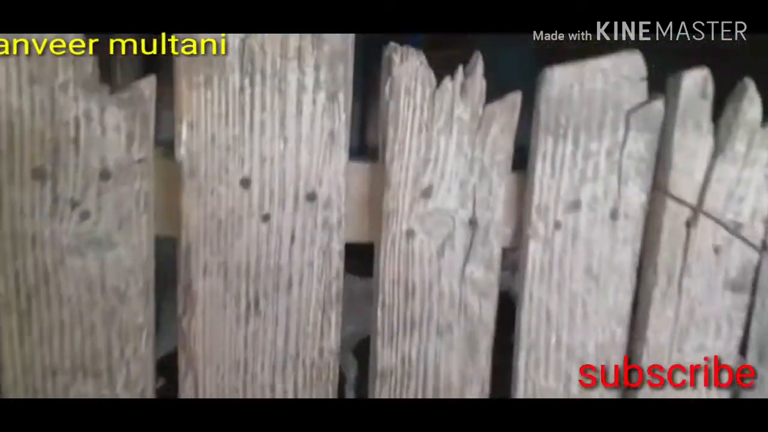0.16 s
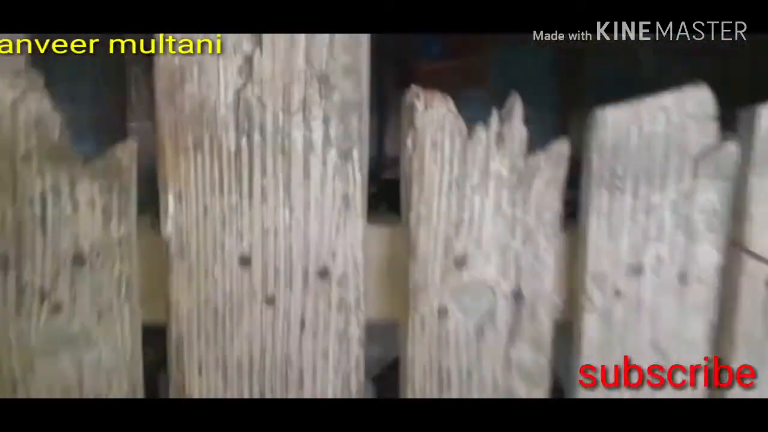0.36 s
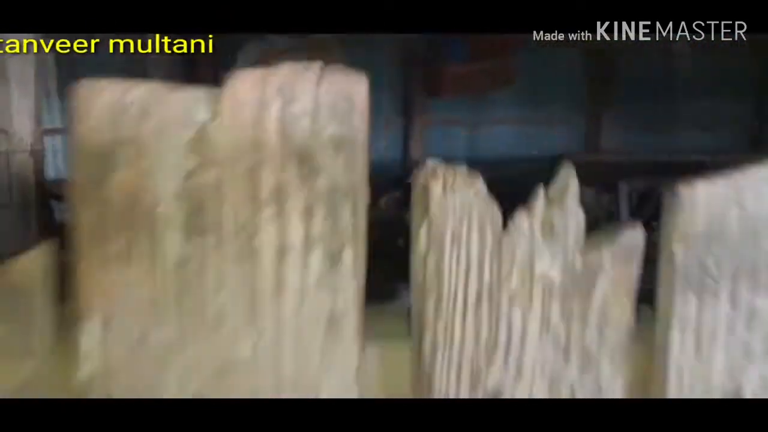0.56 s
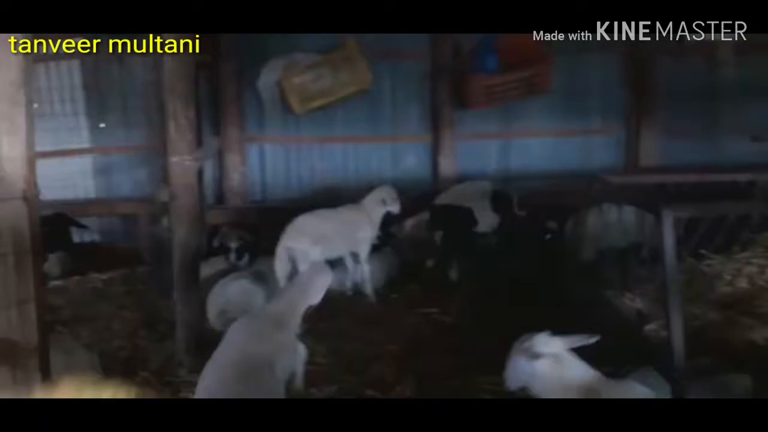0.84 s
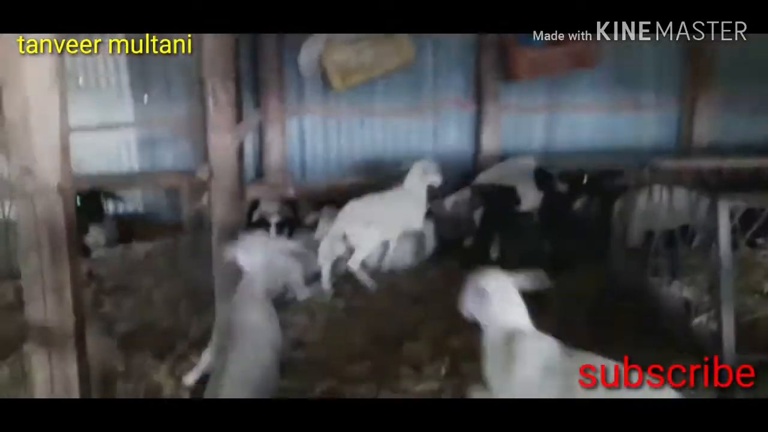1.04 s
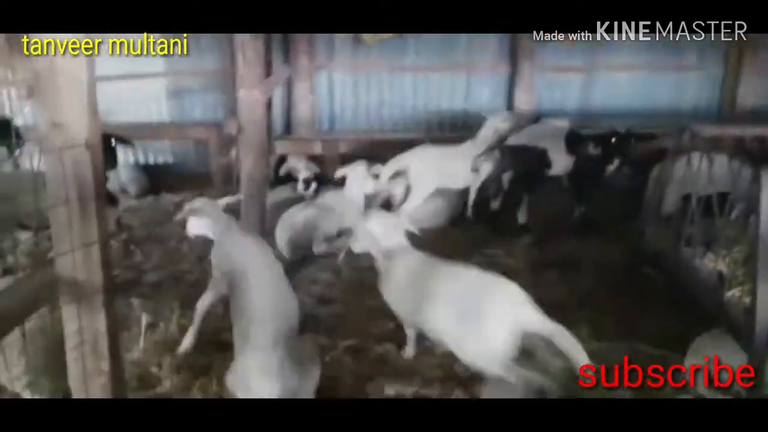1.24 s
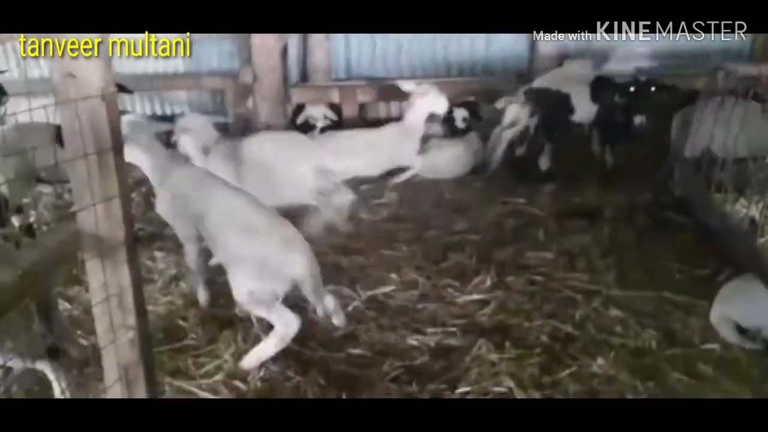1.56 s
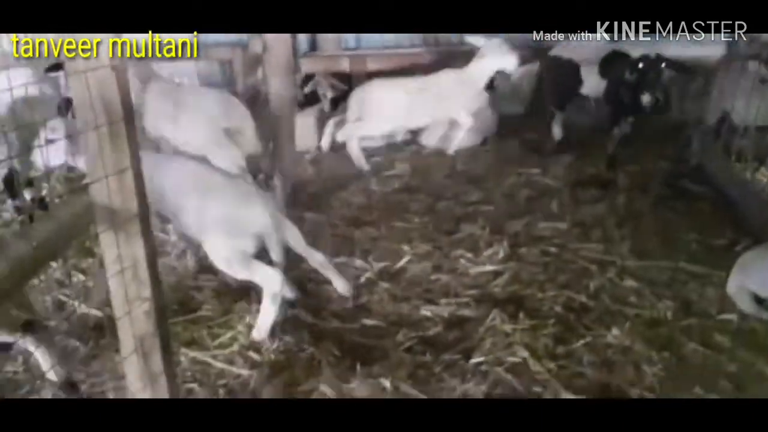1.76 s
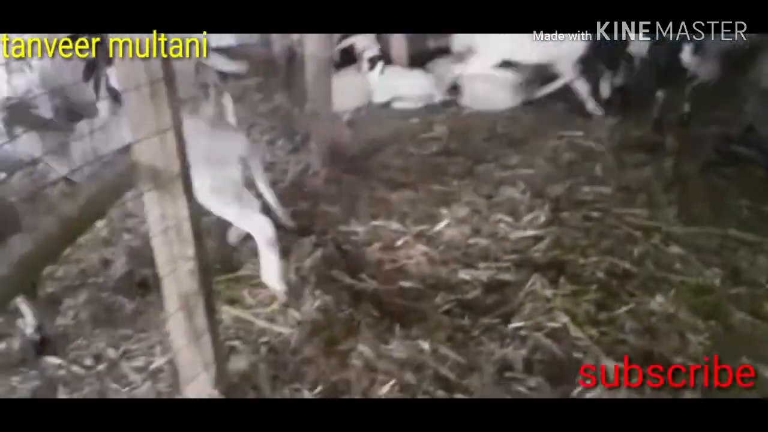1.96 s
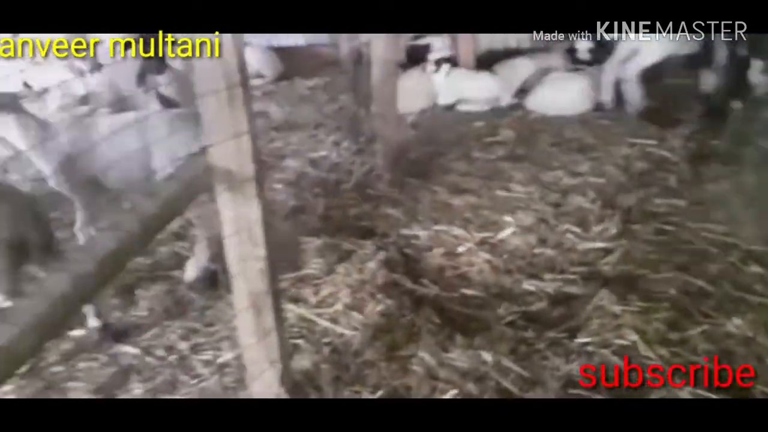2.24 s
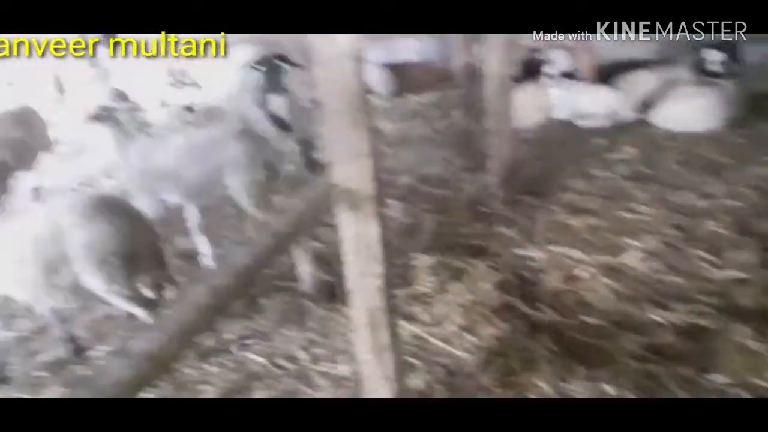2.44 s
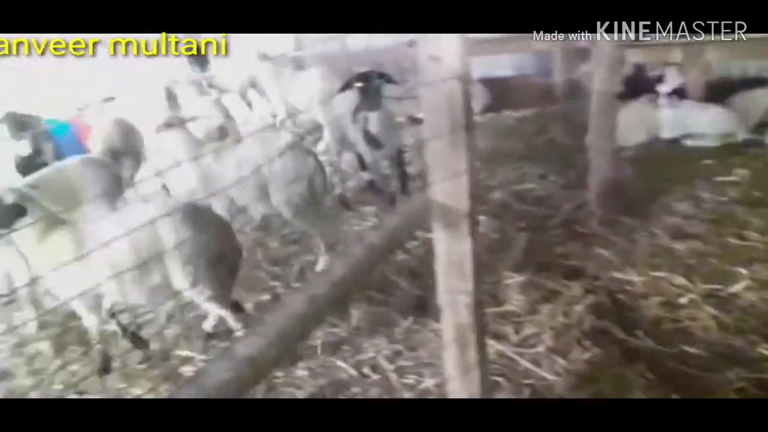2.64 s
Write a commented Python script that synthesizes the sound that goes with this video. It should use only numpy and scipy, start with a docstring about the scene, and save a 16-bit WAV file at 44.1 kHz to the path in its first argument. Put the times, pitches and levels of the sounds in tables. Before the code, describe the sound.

Galloping hooves of bolting sheep, low thuds and hollow knocks over crackling straw in a barn

```python
"""Sheep bolt across the straw-bedded floor of a shed, a few metres from the microphone.
From the start straw hisses and crackles under their legs and the rest of the flock tramples softly behind.
A few hooves skid in short rough scrapes, most of them early on, as filtered noise and wavering tones.
Then hooves fall all through: damped sines and noise give each a low thump and a hollow knock, and those
that meet hard spots add a gritty, ringing clack. The shed returns a short diffuse echo of the near hooves."""
import sys
import numpy as np
from scipy import signal
from scipy.fft import rfft, irfft
from scipy.io import wavfile

SR = 44100
rng = np.random.default_rng(int(sys.argv[2]) if len(sys.argv) > 2 else 0)


def bounce(signal):
    """Save signal as a 16-bit WAV file at the path given by the first command-line argument."""
    frames = np.transpose(np.atleast_2d(signal))
    limited = np.clip(frames, -1, 1)
    pcm = np.round(limited * 32767).astype(np.int16)
    wavfile.write(sys.argv[1], SR, pcm)


N = 123480
HOOF_S = 0.2   # length kept of every near blow

# spectrum of a hoof against a hard surface: f/Hz, relative level/dB per Hz
CLACK_SPECTRUM = [(250, -28), (480, 4.5), (750, 5), (1150, -0.5), (1500, -2.5), (2500, -12), (6000, -70)]


def from_db(db):
    """Decibels to gain."""
    return 10 ** (np.asarray(db) / 20)


def rms_one(x):
    """Scale to unit power."""
    return x / np.sqrt(np.mean(x ** 2) + 1e-20)


def in_time(rows):
    """Join the points of a curve by straight lines."""
    return np.interp(np.arange(N) / SR, *np.transpose(rows))


def at_bins(points, size):
    """Read a curve over log frequency at the bins of a transform."""
    hz, value = np.transpose(points)
    bin_hz = np.arange(size // 2 + 1) * SR / size
    return np.interp(np.log(bin_hz + 1), np.log(hz), value)


def dying(t, t60):
    """Exponential decay by 60 dB in t60 seconds."""
    return np.exp(-np.log(1000) * t / t60)


def linger(kicks, t60):
    """Let every kick die away exponentially, adding to those before it."""
    return signal.lfilter([1], [1, -dying(1 / SR, t60)], kicks)


def colour(pair, spectrum):
    """Two unrelated signals become a stereo sound with this spectrum, alike in the bass; rms 1."""
    # how alike the two sides are: f/Hz, left-right correlation [-1 to 1]
    likeness = [(100, 0.97), (350, 0.88), (700, 0.36), (1400, -0.24), (2800, -0.038), (6000, -0.062),
                (14000, 0.026)]
    size = pair.shape[1]
    mid, side = rfft(pair) * from_db(at_bins(spectrum, size))
    alike = np.clip(at_bins(likeness, size), -.99, .99)
    mid = mid * np.sqrt(1 + alike)
    side = side * np.sqrt(1 - alike)
    return rms_one(irfft(np.array([mid + side, mid - side]), size))


def add(out, s, sound):
    """Mix a sound in at a time, trimmed to the scene."""
    start = int(s * SR)
    first, last = max(start, 0), min(start + sound.shape[-1], N)
    out[:, first:last] += sound[..., first - start:last - start]


def ring(t, modes, pitch, hold_s=0):
    """Damped sines of a struck body, held at full strength for a moment before they decay."""
    decay_t = np.maximum(t - hold_s, 0)
    return sum(from_db(db) * dying(decay_t, t60) * np.sin(2 * np.pi * hz * pitch * t)
               for hz, db, t60 in modes)


def wavering(t, hz, waver, count=90):
    """A tone of height 1 whose pitch wanders by a share, slightly out of step on the two sides."""
    knots = t[::count]
    pitch = hz * (1 + waver * np.interp(t, knots, rng.standard_normal(len(knots))))
    return np.sin(2 * np.pi * np.cumsum(pitch) / SR + rng.uniform(-1.28, 1, (2, 1)))


def flock():
    """Animals farther off trample in dull random thuds: noise swelled by kicks that die away over a bed."""
    # spectrum of the far trampling: f/Hz, relative level/dB per Hz
    trample_spectrum = [(25, -16), (40, -8), (55, -1.5), (90, -3), (120, 0.5), (165, -6), (240, 0),
                        (345, 2.5), (430, -10.5), (600, -18.5), (1100, -25.5), (2200, -25.5), (6000, -32)]
    # the far trampling comes and goes: t/s, level/dB
    trample_level = [(0, -30), (.45, -37.5), (.7, -29.5), (.85, -37), (1.07, -32.5), (1.3, -34.5),
                     (1.94, -34.5), (2.15, -27.5), (2.58, -37.5), (2.8, -36.5)]
    steps_per_s, step_t60_s, bed = 27, 0.16, .45
    steps = (rng.random(N) < steps_per_s / SR) * rng.uniform(0.53, 1, N)
    thuds = bed + linger(steps, step_t60_s)
    trampling = colour(thuds * rng.standard_normal((2, N)), trample_spectrum)
    return from_db(in_time(trample_level)) * trampling


def straw():
    """Stalks rub in a soft hiss and snap in dense tiny clicks, bunched into short crunches."""
    # spectrum of hiss and clicks: f/Hz, relative level/dB per Hz
    straw_spectrum = [(500, 4.5), (1200, 2.5), (2200, -1.5), (4200, 0.5), (5400, -1.5), (7300, -2),
                      (9100, 2), (10500, -3), (12500, 1.5), (15500, -7.5)]
    # stirring of the straw: t/s, relative level/dB
    straw_level = [(0.0, -57), (0.02, -50.5), (0.12, -54.5), (0.14, -44.5), (0.21, -52), (0.22, -44.5),
                   (0.33, -42.5), (0.44, -47.5), (0.49, -41.5), (0.55, -48.5), (0.65, -43), (0.69, -52.5),
                   (0.79, -41), (0.81, -47.5), (0.88, -51), (0.9, -43.5), (0.95, -45.5), (0.985, -36),
                   (1.09, -49.5), (1.19, -43.5), (1.32, -51), (1.35, -46.5), (1.57, -43.5), (1.64, -50.5),
                   (1.65, -41.5), (1.67, -37.5), (1.7, -46.5), (1.81, -47.5), (1.86, -43.5), (1.9, -48),
                   (1.96, -45), (2.12, -43.5), (2.21, -47.5), (2.46, -48), (2.49, -44), (2.53, -49.5),
                   (2.8, -45.5)]
    # lean across the stereo picture: f/Hz, left minus right/dB
    straw_balance = [(1000, -1), (3000, 0), (5000, -2.5), (8000, -5), (10500, 5), (13000, 5.5), (16000, 9)]
    hiss_db, crackle_db, snap_spread_db = 1.5, 1, 2
    snaps_per_s = 3000   # average on each side, denser as the straw stirs more
    crunches_per_s, crunch_size, crunch_t60_s = 42, 0.54, 0.048

    stir = from_db(in_time(straw_level))
    born = rng.random((2, N)) < snaps_per_s * stir / stir.mean() / SR
    heights = from_db(snap_spread_db * np.minimum(rng.exponential(1, (2, N)), 4))
    snaps = born * heights * rng.choice([-1, 1], (2, N))
    hiss = from_db(hiss_db) * colour(rng.standard_normal((2, N)), straw_spectrum)
    crackle = from_db(crackle_db) * colour(snaps, straw_spectrum)
    # bundles of stalks give way at once
    breaks = (rng.random(N) < crunches_per_s / SR) * rng.uniform(0.78, 0.85, N)
    crunch = rms_one(1 + crunch_size * linger(breaks, crunch_t60_s))
    # half the difference goes to each side
    lean = from_db(at_bins(straw_balance, N) * np.array([[.5], [-.5]]))
    return stir * crunch * irfft(rfft(hiss + crackle) * lean, N)


def shed(x):
    """A short diffuse echo from the walls and roof: x convolved with noise that swells in and decays."""
    # colour of the echo: f/Hz, relative level/dB
    echo_spectrum = [(100, -7), (350, -3), (700, -1), (8000, -8)]
    swell_s, echo_t60_s = .012, 0.15
    t = np.arange(SR // 2) / SR
    tail = colour(rng.standard_normal((2, len(t))), echo_spectrum)
    tail = tail * dying(t, echo_t60_s) * np.minimum(t / swell_s, 1) ** 2
    return signal.fftconvolve(x, rms_one(tail) / np.sqrt(len(t)), axes=1)[:, :N]


def skids(rise_s=0.00075, count=130):
    """A sliding hoof sticks and slips in a short, rough, rising scrape, with rubbing noise around it."""
    # skids: t/s, length before the decay/s, relative level/dB, f/Hz midway
    skid_rows = [(-0.005, 0.012, -34.5, 890), (0.076, 0.013, -32.5, 919), (0.236, 0.018, -39, 1190),
                 (0.241, .024, -30.5, 645.4), (0.526, 0.013, -40.5, 868), (2.706, 0.01, -45, 1100)]
    waver, roughness = .06, .6      # shares of pitch and of strength
    pitch_rise_per_s = 2            # share of the pitch per second
    skid_t60_s, rub_db = .065, -4   # rub against the scraping tone
    out, t = np.zeros((2, N)), np.arange(int(HOOF_S * SR)) / SR
    knots = t[::count]
    for s, length, db, hz in skid_rows:
        rub = colour(rng.standard_normal((2, len(t))), CLACK_SPECTRUM)
        grip = np.abs(1 + roughness * np.interp(t, knots, rng.standard_normal(len(knots))))
        pitch = hz * (1 + pitch_rise_per_s * (np.minimum(t, length) - length / 2))
        scrape = rms_one(wavering(t, pitch, waver))
        slide = rms_one(grip * (scrape + from_db(rub_db) * rub))
        shape = np.minimum(t / rise_s, 1) * dying(np.maximum(t - length, 0), skid_t60_s)
        add(out, s, from_db(db) * slide * shape)
    return out


def grains(size, top_hz, count=30):
    """Gritty noise in tiny uneven clumps, dulled above its top by the bedding."""
    # spectrum of the grit: f/Hz, relative level/dB per Hz
    grit_spectrum = [(700, 5.5), (1300, 0.5), (1800, 0.5), (2400, -0.5), (3300, -1.5), (4400, 3),
                     (5600, -12), (14000, -31)]
    clump_db = 4 * rng.uniform(-1.8, 2.0, size // count + 1)
    clumps = np.repeat(from_db(clump_db), count)[:size]
    noise = colour(rng.standard_normal((2, size)) * clumps, grit_spectrum)
    return rms_one(signal.sosfilt(signal.butter(5, top_hz, fs=SR, output="sos"), noise))


def wood(t, side_phase=0.27):
    """One blow on the woody modes, each reaching the two sides slightly out of step."""
    # woody ring in a clack: f/Hz, relative level/dB, t60/s
    wood_modes = [(466, 0, 0.099), (747, 0.5, 0.075), (941, -2, 0.13), (1126, -9.5, 0.062),
                  (1503, -14, 0.12), (1765, -12.5, 0.099), (1940, -8.5, 0.11)]
    wood_db, spread_db = -10, 2   # every blow strikes these modes differently
    out = 0
    for hz, db, t60 in wood_modes:
        phase = rng.uniform(0, 2 * np.pi) + side_phase * rng.standard_normal((2, 1))
        gain = from_db(wood_db + db + spread_db * rng.standard_normal())
        out = out + gain * dying(t, t60) * np.sin(2 * np.pi * hz * t + phase)
    return out


def clatter(t):
    """The envelope of a blow's first snap, then smaller ones at random as the hoof settles."""
    rebounds_per_s, rebound_size = 130, .8
    snap_db, snap_t60_s = 3, .014
    born = rng.random(len(t)) < rebounds_per_s / SR
    jolts = born * rng.random(len(t)) * rebound_size * dying(t, HOOF_S)
    jolts[0] = 1
    return from_db(snap_db) * linger(jolts, snap_t60_s)


def clacks():
    """A hoof that meets something hard clatters, crushes grit and sets that spot ringing at its own pitch."""
    # hard blows: t/s, clack level/dB, grit level/dB, top of the grit f/Hz, ring level/dB, ring f/Hz
    # (levels relative, ring pitch wavers)
    hard_blows = [(0.395, -30.5, -31.5, 2400, -46, 610), (0.134, -41, -41, 1800, -24, 610),
                  (0.577, -25, -38, 1750, -23, 798), (0.651, -32, -42, 2400, -26, 660),
                  (0.745, -41, -39, 2440, -39, 714), (0.217, -39, -48, 1800, -37, 640),
                  (0.9985, -18.5, -25, 4900, -15, 1123), (1.009, -29, -36, 4700, -26, 1000),
                  (1.028, -35, -42, 4300, -39, 735), (1.120, -34, -38.5, 3930, -26, 643),
                  (1.181, -43, -49, 2200, -26.5, 510), (1.304, -37.5, -43, 1490, -42.5, 1105),
                  (1.356, -30, -51, 1700, -33, 1182), (1.449, -37.5, -49, 1700, -29, 816),
                  (1.470, -32.5, -39, 2200, -37, 933), (1.582, -29, -35, 2320, -16, 480),
                  (1.607, -41, -50, 1500, -27, 490), (1.676, -34, -30, 2300, -26, 1750),
                  (2.041, -34, -35, 2210, -22, 680), (2.072, -33, -34.5, 2880, -25.5, 610),
                  (2.175, -34, -54, 1500, -16.5, 745), (2.280, -43.5, -33.5, 1980, -32, 1014)]
    noise_db, noise_t60_s = .5, .1
    grit_gain_db, grit_t60_s = 7, .1
    tock_waver, tock_t60_s = .06, .045   # waver as a share of the pitch
    rise_s = .0004
    out, t = np.zeros((2, N)), np.arange(int(HOOF_S * SR)) / SR
    for s, clack_db, grit_db, top_hz, tock_db, tock_hz in hard_blows:
        snap = clatter(t)
        noise = from_db(noise_db) * colour(rng.standard_normal((2, len(t))), CLACK_SPECTRUM)
        clack = noise * (dying(t, noise_t60_s) + snap) / 2 + wood(t)
        grit = from_db(grit_gain_db) * grains(len(t), top_hz) * (dying(t, grit_t60_s) + snap) / 2
        tock = wavering(t, tock_hz, tock_waver) * dying(t, tock_t60_s)
        blow = from_db(clack_db) * clack + from_db(grit_db) * grit + from_db(tock_db) * tock
        add(out, s, blow * np.minimum(t / rise_s, 1))
    return out


def hooves():
    """Each hoof rings the floor in low damped sines and knocks on the packed bedding."""
    # hoof falls: t/s, thump level/dB, knock level/dB, knock pitch f/Hz (levels relative)
    hoof_falls = [(0.063, -48, -24, 334), (0.133, -29, -12, 322.5), (0.144, -40, -15, 317),
                  (0.216, -42, -22.5, 265), (0.245, -25, -26, 244), (0.322, -29, -30, 342),
                  (0.395, -33, -23.5, 280), (0.498, -26, -28, 335), (0.577, -14.5, -13.5, 321),
                  (0.622, -19, -25.5, 338), (0.65, -19, -21.5, 276), (0.69, -28.5, -33, 294),
                  (0.745, -27, -20.5, 302), (0.775, -24.5, -32, 269), (0.891, -26, -28, 299),
                  (0.91, -24, -29.5, 306), (0.998, -28, -11, 350), (1.009, -29, -14, 349.7),
                  (1.028, -22.5, -18.5, 358), (1.065, -24, -32, 300), (1.119, -31, -16, 321),
                  (1.181, -26.5, -25.5, 332), (1.245, -32, -33, 319), (1.302, -45, -35.5, 307),
                  (1.357, -49, -22.5, 283), (1.383, -24, -31.5, 271), (1.411, -26.5, -30, 269),
                  (1.448, -29, -30.5, 262), (1.471, -29, -27.5, 306), (1.560, -47, -23, 334),
                  (1.582, -15, -17.5, 332.5), (1.595, -38, -14.5, 334), (1.633, -39, -24.5, 329),
                  (1.676, -27.5, -32, 303), (1.685, -29, -14, 319.6), (1.728, -30, -26.5, 340),
                  (1.783, -29, -27.5, 346), (1.868, -24, -21.5, 262.6), (1.935, -34, -40, 310),
                  (2.042, -30, -16.5, 335), (2.067, -14.5, -17, 306), (2.092, -26, -19, 333),
                  (2.174, -20, -17.5, 343), (2.199, -30, -20.5, 298), (2.232, -21.5, -27.5, 277),
                  (2.286, -27, -27.5, 363), (2.313, -24.5, -20.5, 311), (2.363, -31, -27.5, 303),
                  (2.406, -43, -17, 344), (2.499, -34, -27, 361), (2.533, -32.5, -30, 299),
                  (2.641, -26, -28.5, 317), (2.716, -26, -35, 274)]
    # low ring of the floor: f/Hz before the 0.99 tuning below, relative level/dB, t60/s
    floor_modes = [(58.2, -1.5, 0.21), (93.5, 0.5, 0.12), (114.3, -1, 0.22), (159, -16, 0.049)]
    # hollow knock: multiple of the knock pitch, relative level/dB, t60/s
    knock_modes = [(0.681, -6, 0.097), (1.001, 5, 0.061), (1.219, -7.5, 0.051), (1.552, -16.5, 0.068)]
    # spectrum of the noise in a knock: f/Hz, relative level/dB per Hz
    body_spectrum = [(100, 10.5), (180, -11), (250, 12), (345, 5.5), (430, -7), (560, -24), (900, -34),
                     (2000, -52)]
    knock_contact_s, thump_contact_s = 0.0024, 0.0029   # the bedding cushions each blow
    knock_hold_s, body_db, body_t60_s = .006, -11, 0.14
    out, t = np.zeros((2, N)), np.arange(int(HOOF_S * SR)) / SR
    cushion = 1 - np.exp(-t / knock_contact_s)
    thump = ring(t, floor_modes, 0.99) * (1 - np.exp(-t / thump_contact_s))
    for s, thump_db, knock_db, hz in hoof_falls:
        noise = colour(rng.standard_normal((2, len(t))), body_spectrum)
        body = from_db(body_db) * noise * dying(t, body_t60_s)
        knock = cushion * (body - ring(t, knock_modes, hz, knock_hold_s))
        add(out, s, from_db(thump_db) * thump + from_db(knock_db) * knock)
    return out


def scene():
    """Near hooves with their echo, over straw and the distant flock."""
    echo_db = -10.5
    background = flock() + straw()
    feet = skids() + clacks() + hooves()
    return background + from_db(echo_db) * shed(feet) + feet


def record(dry):
    """The microphone loses the deepest bass; the top is cut steeply."""
    low_cut_hz, top_cut_hz = 67, 15750
    low_cut = signal.butter(3, low_cut_hz, "high", fs=SR, output="sos")
    top_cut = signal.ellip(12, .1, 80, top_cut_hz, fs=SR, output="sos")
    return signal.sosfilt(top_cut, signal.sosfilt(low_cut, dry))


dry = scene()
out = record(dry)
bounce(out)
```